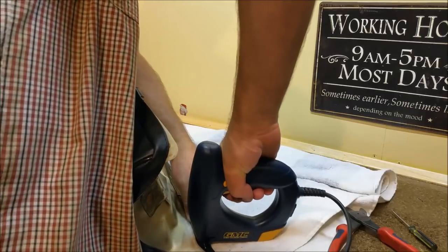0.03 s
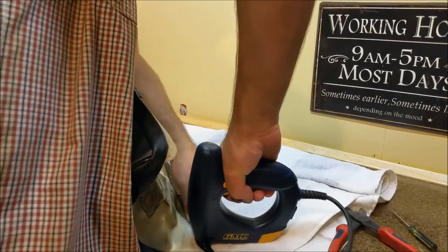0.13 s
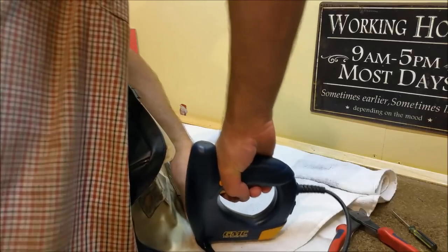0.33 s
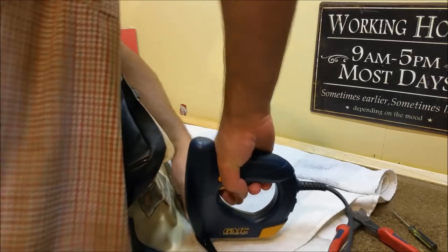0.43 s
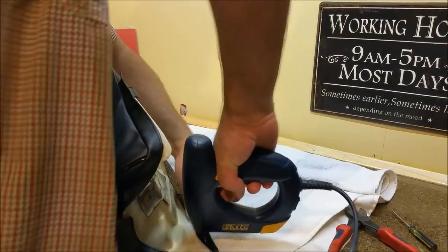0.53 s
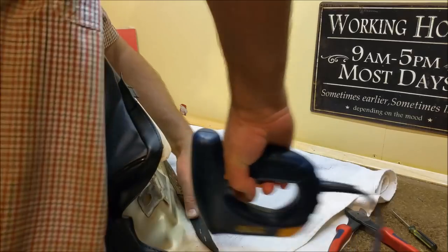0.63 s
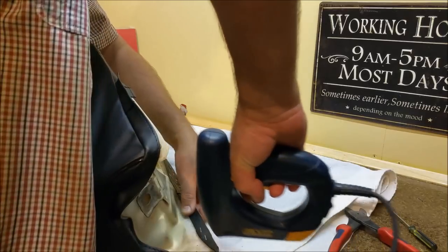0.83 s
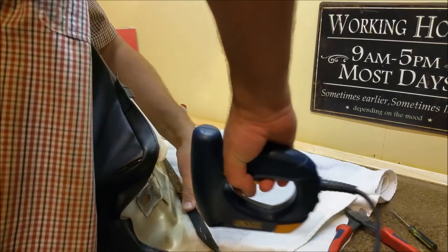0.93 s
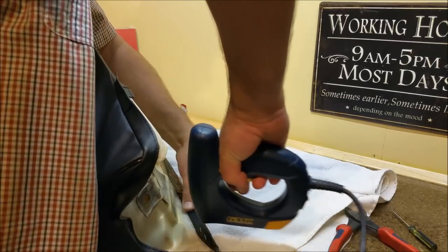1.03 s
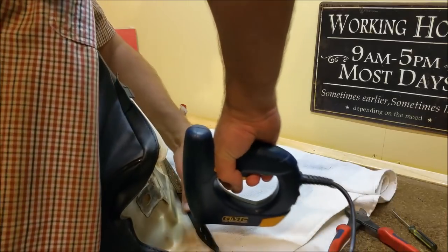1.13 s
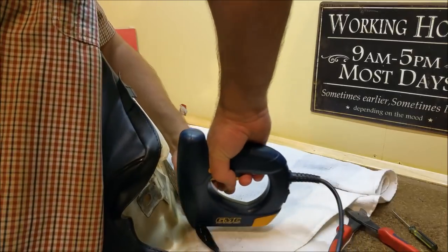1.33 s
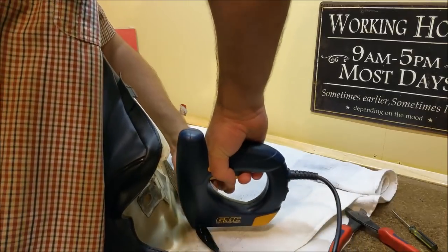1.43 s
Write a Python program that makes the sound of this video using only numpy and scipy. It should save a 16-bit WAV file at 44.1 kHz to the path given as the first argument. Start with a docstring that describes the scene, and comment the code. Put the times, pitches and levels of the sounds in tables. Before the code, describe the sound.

An electric staple gun fires once at about 0.21 s: a slight plunger start, hard bright snap, rebound clatter, low thump and dull knock, ringing out in a small room over roughly 0.4 s. It overloads the close microphone, leaving later sounds turned down. A thin, rapid trill near 3.7 kHz pulses over soft rumble until 1.2 s. Faint vinyl ticks and rubbing, strongest around 0.4-0.6 s; soft bump at 1.2 s, chirps at 1.39 and 1.45 s.

```python
"""A thin pulsing whine, probably a cricket, trills over a quiet rumble in a small workshop, amid faint handling noise.
An electric staple gun fires once into a vinyl cover: the plunger starts, snaps the staple home and knocks back.
Filtered noise cracks and decaying sines ring the housing, work, bench and room; noise swells rustle the vinyl as
the gun is lifted. The trill pauses, a soft bump marks the gun set down, and two chirps follow.
The snap overloads the microphone and leaves its gain turned down."""
import sys
import numpy as np
from scipy import signal
from scipy.fft import rfft, irfft
from scipy.io import wavfile
from scipy.ndimage import uniform_filter1d

SR = 44100
rng = np.random.default_rng(int(sys.argv[2]) if len(sys.argv) > 2 else 0)


def unload_wav(signal):
    """Save mono or channel-first audio to the path in sys.argv[1] as 16-bit WAV at rate SR, clipped to [-1, 1]."""
    wavfile.write(
        sys.argv[1],
        SR,
        np.round(np.clip(np.atleast_2d(signal).T, -1, 1) * 32767).astype(np.int16),
    )


N = 66150

# Stereo width of diffuse sound. Each row: frequency in Hz, side over mid as a ratio 0-1.
STEREO_WIDTH = [(50, 0), (150, 0.4), (300, 0.4), (900, 0.8), (2000, 0.99), (16000, .95)]
# Spectrum of the quiet rumble. Each row: frequency in Hz, relative density in dB per Hz.
RUMBLE_SPECTRUM = [(20, -8), (45, 2), (90, -0.5), (160, -3.5), (300, -7.5), (480, -11), (650, -16),
                   (1600, -21), (3300, -27), (5000, -28), (16000, -35.5)]
RUMBLE_DB = -59.5

# Trill level before the direct and room gains. Each row: time in seconds, level in dB.
TRILL_LEVEL = [(0, -40.5), (.18, -43), (.4, -46), (.63, -45), (.75, -47), (1.05, -47), (1.2, -49.5)]
# Single chirps after the pause, before the same gains. Each row: start in seconds, length in seconds, level in dB.
LATE_CHIRPS = [(1.387, 0.035, -43), (1.445, 0.042, -41.5)]
# Harmonics of the whine. Each row: multiple of the pitch, level in dB.
TRILL_HARMONICS = [(1, 3.5), (2, -30.5), (3, -32), (4, -37.5)]
TRILL_START_S, TRILL_PERIOD_S, TRILL_END_S = -.016, .03766, 1.21
PULSE_S, PULSE_ROUNDNESS, PULSE_FADE_DB = .028, 1.3, -8
PULSE_HZ, PULSE_SAG_HZ, SAG_POWER = 3786, 562, 3.0
PITCH_SPREAD_HZ, LEVEL_SPREAD_DB = 14, 0.89
TRILL_DIRECT_DB, TRILL_ROOM_DB, TRILL_T60_S = 8.5, 8, .27
TRILL_LATE_DB, TRILL_LATE_T60_S = -19, 0.83  # a weaker, longer tail

# Creaks and ticks of vinyl and grip. Each row: start in seconds, level in dB.
TICKS = [(0.0268, -68), (.055, -51.5), (.1425, -50.5), (0.5018, -50), (.5594, -53.5), (.6194, -56),
         (.7194, -65), (.8374, -69), (0.8976, -55), (0.9336, -58)]
# Spectrum of the ticks. Each row: frequency in Hz, relative density in dB per Hz.
TICK_SPECTRUM = [(100, -1), (700, -7.5), (1800, -2.5), (3000, -4.5), (6000, -8), (15000, -23)]
TICK_T60_S = 0.026
# Rubbing and shifting of vinyl, cloth and grip.
# Each row: start in seconds, length in seconds, level before the swell in dB, centre in Hz.
RUBS = [(-.03, .25, -85, 1620), (0.043, 0.19, -60.5, 61.4), (0.431, 0.13, -46, 320.6),
        (0.399, 0.36, -60, 169.5), (0.404, 0.46, -61, 420), (0.459, .14, -65, 2000), (0.57, .16, -69, 1390),
        (0.787, 0.051, -63.5, 1091), (0.856, 0.22, -66, 843), (1.231, .18, -65.5, 1750)]
RUB_OCTAVES, RUB_GRAIN = 0.15, 0.2  # half-width at half amplitude; depth of the grain
BUMP_S, BUMP_HZ, BUMP_DB, BUMP_T60_S = 1.207, 80, -48, .15

# Blows of the plunger. Each row: start in seconds, level before the treble cut in dB, cutoff in Hz.
BLOWS = [(0.2107, -19, 1505), (.2137, 0, 13900), (0.217, -5, 3900), (0.2232, -7, 2000), (0.2268, -13, 3500)]
# Modes of the gun's housing. Each row: frequency in Hz, level in dB, t60 in seconds.
HOUSING_MODES = [(725, -7.5, .07), (915, -8.5, 0.073), (1268, -12, .09), (1294, -2.5, .07),
                 (1427, -10, .11), (1517, -9.5, .09), (1710, -4, 0.24), (2000, -17.5, 0.069),
                 (2450, -7, 0.15), (3480, -10, .06), (4030, -18.5, 0.23), (5350, -21, .08)]
# Spectrum of the crack. Each row: frequency in Hz, relative density in dB per Hz.
CRACK_SPECTRUM = [(25, -29), (60, -12.5), (250, -7.5), (500, -0.5), (1150, -2.5), (1800, -1), (2770, -16.5),
                  (4030, -5.5), (6020, -14.5), (6820, -11), (7540, -19), (12100, -15.5), (16000, -15)]
HOUSING_DB, CRACK_DB, CRACK_T60_S, CRACK_WIDTH = -3.5, 5, 0.042, 0.71
PORT_LAG_S = 0.00016  # the rings reach the two microphone ports one after the other

THUMP_S, THUMP_HZ, THUMP_DB, THUMP_T60_S = .2135, 85, -8, .06
THUMP_PAN_DB, THUMP_LAG_S = -5, 0.0014  # first channel over second; lag between channels

# Longer rings of the bench and room. Each row: frequency in Hz, level in dB, t60 in seconds.
BENCH_MODES = [(146, -26, .55), (262, -29, .45), (433, -23, .38), (520, -24, .38), (590, -24, .33),
               (1330, -29, .3), (1577, -29, .3), (1884, -26, .24), (2350, -26, .25)]
# Spectrum of the room's wash. Each row: frequency in Hz, relative density in dB per Hz.
ROOM_SPECTRUM = [(24, -48.5), (40, -21.5), (243, -6.5), (312, -6.5), (412, -5), (990, -6.5), (2320, -6.5),
                 (5180, -9), (6170, -14), (10200, -17), (16000, -26)]
# Decay of the room. Each row: band centre in Hz, t60 in seconds.
ROOM_DECAY = [(60, .45), (200, .48), (500, .4), (1200, .32), (2500, .33), (5000, .255), (10000, .205),
              (16000, .165)]
ROOM_DB, ROOM_DELAY_S, ROOM_BUILD_S = -6, .004, .008

# Modes of the covered work under the nose, a dull knock. Each row: frequency in Hz, level in dB, t60 in seconds.
WORK_MODES = [(350, -11.5, 0.067), (420, -6, 0.065), (516.6, -17.5, .2), (596, -10.5, .14),
              (760.4, -5, 0.1)]
KNOCK_S, KNOCK_DB, KNOCK_RISE_S = .2205, 1, .002

LOW_CUT_HZ, TOP_HZ = 12, 15900
GAIN_THRESHOLD_DB, GAIN_ATTACK_S = -12.5, 0.0087
GAIN_SLOPE = 0.68  # dB of reduction per dB of held level above threshold
HELD_CREEP_DB_S = 3.75  # the held level climbs this fast until a louder sound resets it


def undb(db):
    """Decibels to amplitude gain."""
    return 10 ** (np.asarray(db) / 20)


def unit(x):
    """Scale to rms 1."""
    return x / np.sqrt(np.mean(x ** 2))


def clock():
    """Time of every sample in seconds."""
    return np.arange(N) / SR


def freqs():
    """Frequency of every spectral bin in Hz, at least 1."""
    return np.maximum(np.arange(N // 2 + 1) * SR / N, 1)


def lookup(table, hz):
    """Read a table on a log-frequency axis."""
    table_hz, values = np.array(table, float).T
    return np.interp(np.log(hz), np.log(table_hz), values)


def spectrum(table):
    """Amplitude gain of every bin from a table in dB."""
    return undb(lookup(table, freqs()))


def noise(gain, width=1):
    """Diffuse stereo noise of rms 1 with the given spectrum, narrower in the bass."""
    mid, side = rfft(rng.standard_normal((2, N))) * gain
    side = side * width * lookup(STEREO_WIDTH, freqs())
    return unit(irfft(np.array([mid + side, mid - side]), N))


def fade(start, t60):
    """Sudden start and exponential decay by 60 dB in t60 seconds."""
    age = clock() - start
    return (age >= 0) * np.exp(-np.log(1000) * np.maximum(age, 0) / t60)


def build_up(start, seconds):
    """Exponential approach from 0 to 1 after the start."""
    return 1 - np.exp(-np.maximum(clock() - start, 0) / seconds)


def ring(modes, start, lag_s=PORT_LAG_S):
    """Decaying sines struck at one moment, their phases offset by the lag between channels."""
    age = clock() - start + np.array([[.5], [-.5]]) * lag_s
    out = 0
    for hz, db, t60 in modes:
        out = out + undb(db) * fade(start, t60) * np.sin(2 * np.pi * hz * age)
    return out


def rumble():
    """Steady, bass-heavy noise floor of the place."""
    return undb(RUMBLE_DB) * noise(spectrum(RUMBLE_SPECTRUM))


def trill_pulse(u, detune, push, db):
    """One rounded, nearly pure pulse that sags in pitch and fades as u runs from 0 to 1."""
    pitch_hz = PULSE_HZ + PITCH_SPREAD_HZ * detune - PULSE_SAG_HZ * u ** SAG_POWER
    phase = 2 * np.pi * np.cumsum(pitch_hz) / SR
    tone = sum(undb(level) * np.sin(round(multiple) * phase) for multiple, level in TRILL_HARMONICS)
    level_db = db + LEVEL_SPREAD_DB * push + PULSE_FADE_DB * u
    return undb(level_db) * np.sin(np.pi * u) ** PULSE_ROUNDNESS * tone


def trill():
    """Regular pulses, then late chirps, heard directly and smeared by decaying room noise."""
    t = clock()
    starts = np.arange(TRILL_START_S, TRILL_END_S, TRILL_PERIOD_S)
    levels = np.interp(starts, *np.array(TRILL_LEVEL).T)
    pulses = [(start, PULSE_S, db) for start, db in zip(starts, levels)] + list(LATE_CHIRPS)
    source = np.zeros(N)
    for start, length, db in pulses:
        detune, push = rng.standard_normal(2)
        on = (t >= start) & (t < start + length)
        source[on] += trill_pulse((t[on] - start) / length, detune, push, db)
    tail = fade(0.0013, TRILL_T60_S) + undb(TRILL_LATE_DB) * fade(.003, TRILL_LATE_T60_S)
    walls = rng.standard_normal((2, N)) * tail
    wet = signal.fftconvolve(source[None], walls, axes=1)[:, :N]
    wet = wet * source.std() / wet.std(axis=1, keepdims=True)
    direct = np.array([np.roll(source, shift=4), source])  # first channel 4 samples late
    return undb(TRILL_DIRECT_DB) * direct + undb(TRILL_ROOM_DB) * wet


def rubs():
    """Vinyl, cloth and grip rub as narrow bands of noise in grainy swells."""
    out = 0
    for start, length, db, hz in RUBS:
        swell = np.sin(np.pi * np.clip((clock() - start) / length, 0, 1))
        roughness = unit(uniform_filter1d(rng.standard_normal(N), size=150))
        grain = unit(np.exp(RUB_GRAIN * roughness))
        octaves_off = np.log2(freqs() / hz)
        band = noise(1 / (1 + (octaves_off / RUB_OCTAVES) ** 2))
        out = out + undb(db) * swell * grain * band
    return out


def ticks():
    """Vinyl and grip creak and tick as short decaying bursts of noise."""
    bursts = sum(undb(db) * fade(start, TICK_T60_S) for start, db in TICKS)
    return noise(spectrum(TICK_SPECTRUM)) * bursts


def staple_gun():
    """Each blow cracks and rings the housing; a lower treble cut makes softer contacts duller."""
    out = 0
    for start, db, cutoff_hz in BLOWS:
        burst = noise(spectrum(CRACK_SPECTRUM), CRACK_WIDTH) * fade(start, CRACK_T60_S)
        blow = undb(CRACK_DB) * burst + undb(HOUSING_DB) * ring(HOUSING_MODES, start)
        b, a = signal.butter(1, cutoff_hz, fs=SR)
        out = out + undb(db) * signal.lfilter(b, a, blow)
    return out


def snap_thump():
    """The snap shoves the bench: one low decaying sine, stronger in the second channel."""
    pan = undb(np.array([[.5], [-.5]]) * THUMP_PAN_DB)
    return pan * ring([(THUMP_HZ, THUMP_DB, THUMP_T60_S)], THUMP_S, THUMP_LAG_S)


def workshop():
    """The room answers the hardest blow, its high treble dying first; the bench hums on."""
    hardest = max(BLOWS, key=lambda row: row[1])
    start = hardest[0] + ROOM_DELAY_S
    wash = rfft(noise(spectrum(ROOM_SPECTRUM)))
    decaying = 0
    for hz, t60 in ROOM_DECAY:
        # overlapping bands that sum to one
        share = lookup([(f, f == hz) for f, _ in ROOM_DECAY], freqs())
        decaying = decaying + irfft(wash * share, N) * fade(start, t60)
    answer = undb(ROOM_DB) * decaying + ring(BENCH_MODES, start)
    return build_up(start, ROOM_BUILD_S) * answer


def work_knock():
    """The covered work under the nose knocks dully: decaying modes with a softened onset."""
    return undb(KNOCK_DB) * build_up(KNOCK_S, KNOCK_RISE_S) * ring(WORK_MODES, KNOCK_S)


def bump():
    """The gun is set down softly on the padded bench: one low decaying sine."""
    return ring([(BUMP_HZ, BUMP_DB, BUMP_T60_S)], BUMP_S)


def scene():
    """Rumble, trill and handling, with the gun, bench, room and work sounding together."""
    background = rumble() + trill()
    handling = rubs() + ticks() + bump()
    shot = staple_gun() + snap_thump() + workshop() + work_knock()
    return background + handling + shot


def record(dry):
    """The microphone's gain ducks fast and keeps sinking slowly; peaks are rounded, both ends of the band cut."""
    low_cut = signal.butter(2, LOW_CUT_HZ, "high", fs=SR, output="sos")
    dry = signal.sosfilt(low_cut, dry)
    k = 1 - np.exp(-1 / (GAIN_ATTACK_S * SR))
    power = signal.lfilter([k], [1, k - 1], np.mean(dry ** 2, axis=0))
    heard_db = 10 * np.log10(power + 1e-12)
    creep_db = HELD_CREEP_DB_S * clock()
    held_db = np.maximum.accumulate(heard_db - creep_db) + creep_db
    reduction_db = GAIN_SLOPE * np.maximum(held_db - GAIN_THRESHOLD_DB, 0)
    rounded = np.tanh(dry * undb(-reduction_db))
    top_cut = signal.ellip(8, .2, 70, TOP_HZ, fs=SR, output="sos")
    return signal.sosfilt(top_cut, rounded)


dry = scene()
out = record(dry)
unload_wav(out)
```